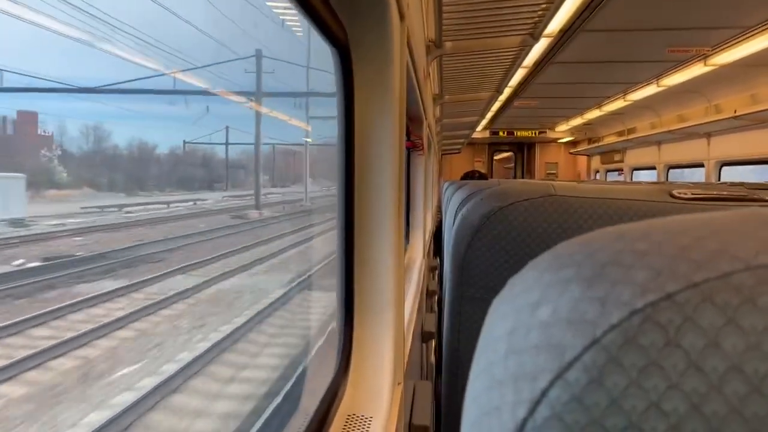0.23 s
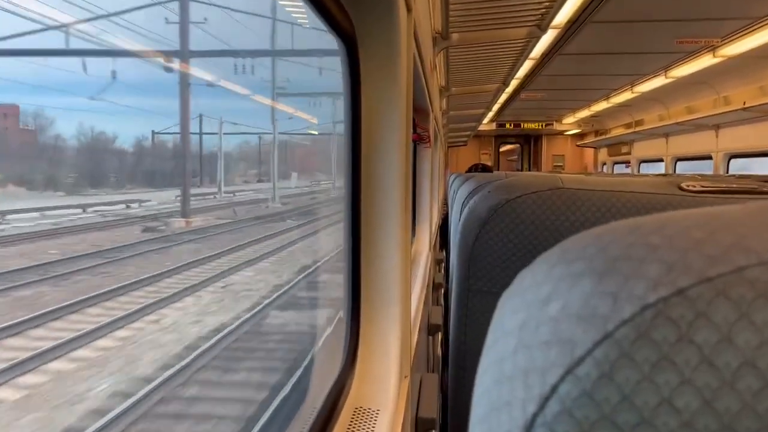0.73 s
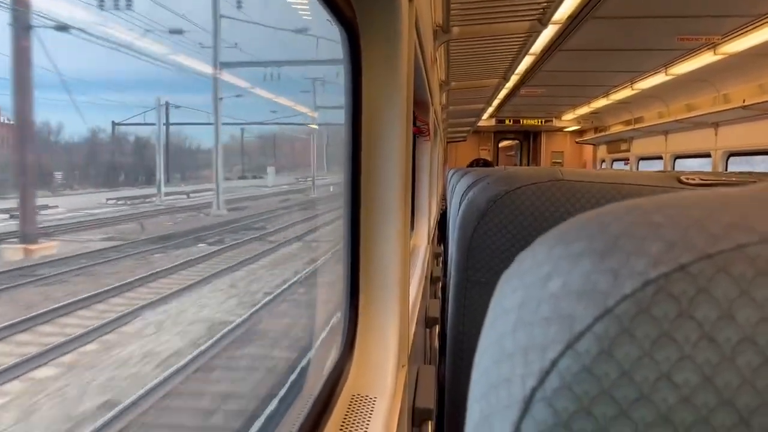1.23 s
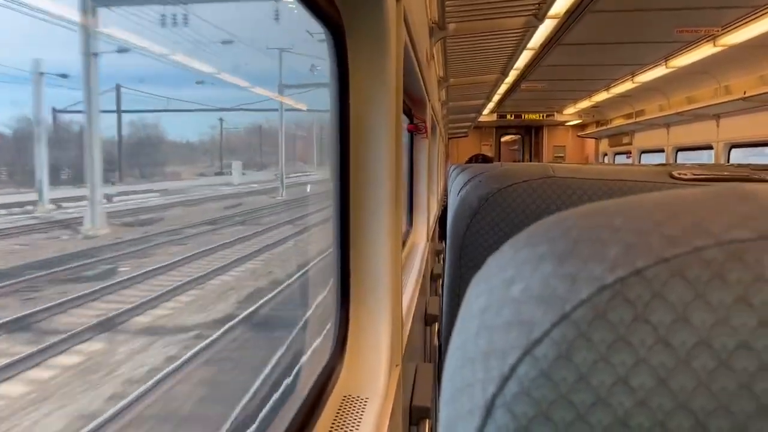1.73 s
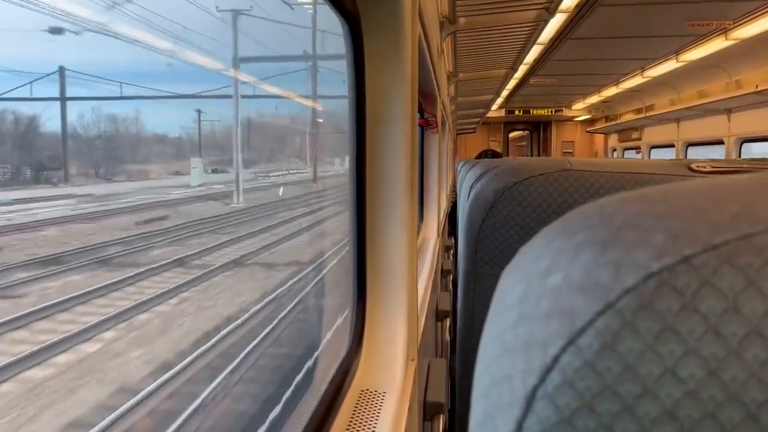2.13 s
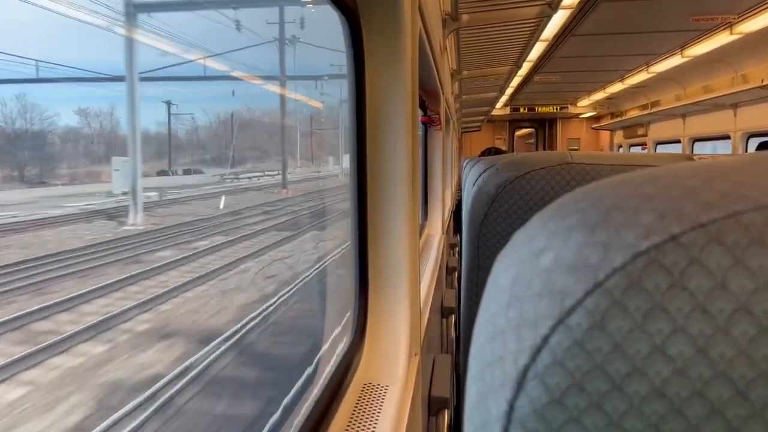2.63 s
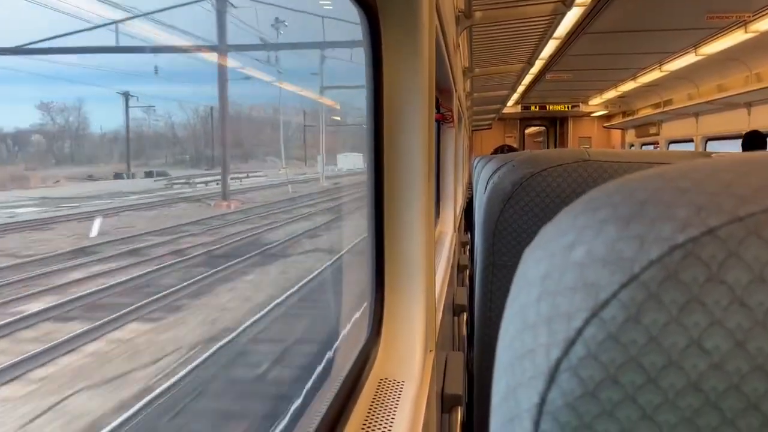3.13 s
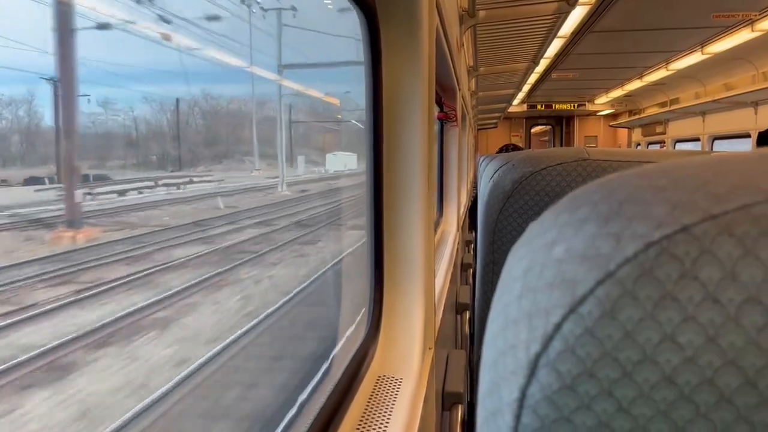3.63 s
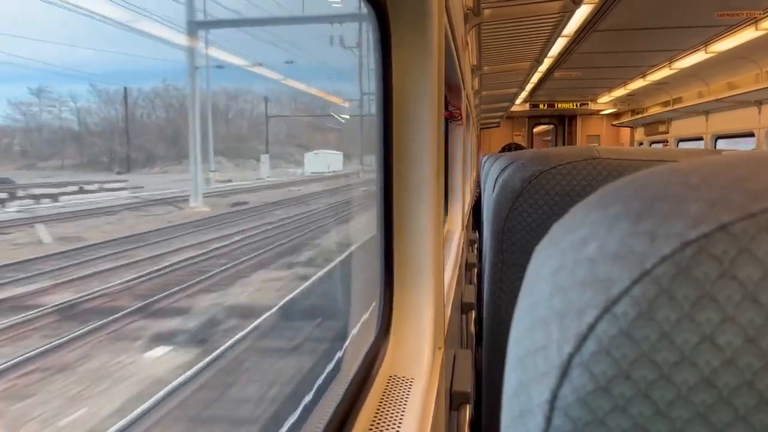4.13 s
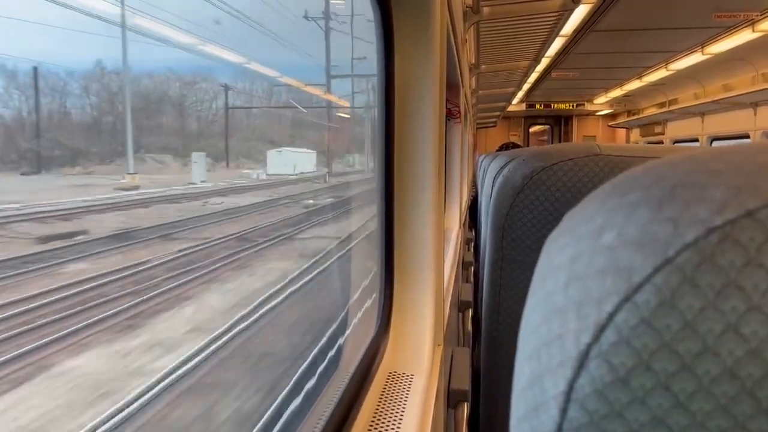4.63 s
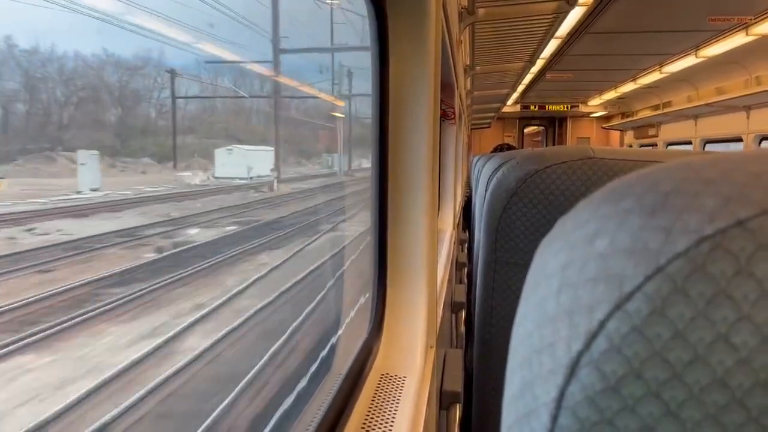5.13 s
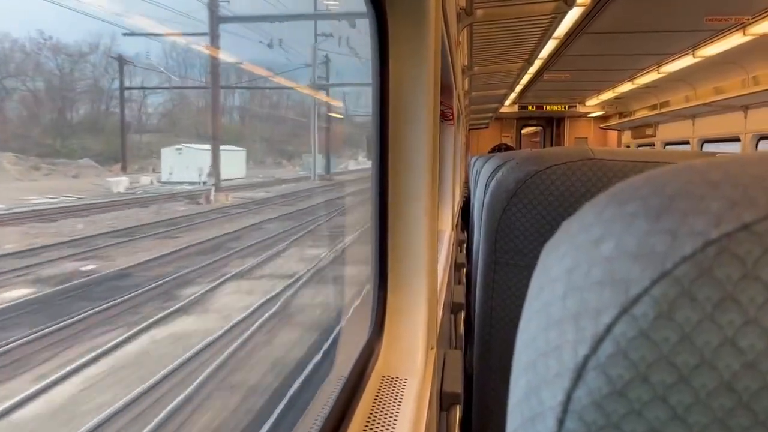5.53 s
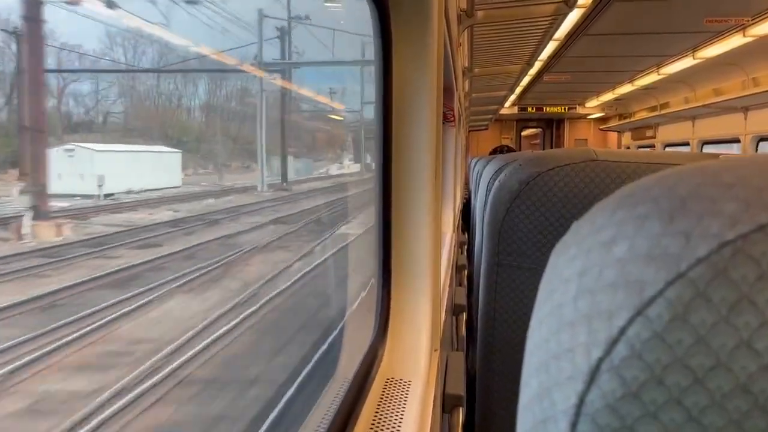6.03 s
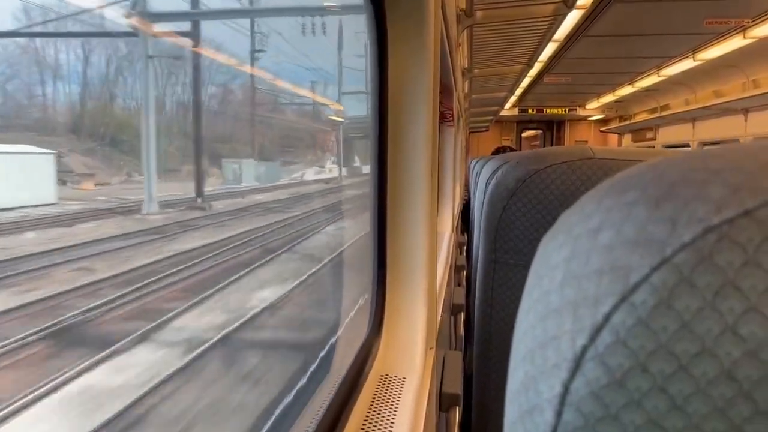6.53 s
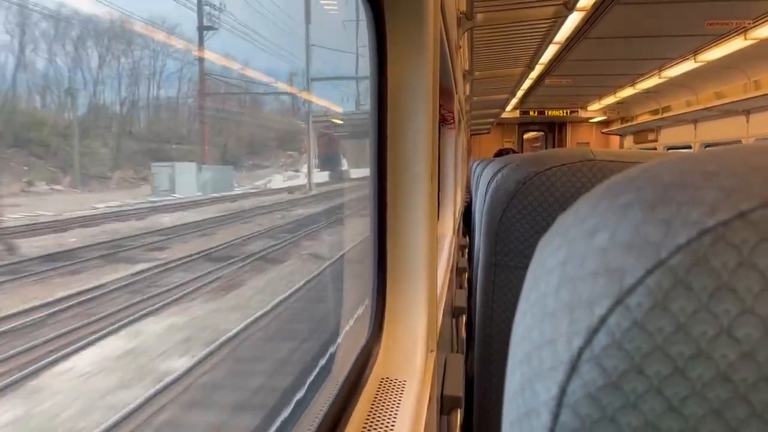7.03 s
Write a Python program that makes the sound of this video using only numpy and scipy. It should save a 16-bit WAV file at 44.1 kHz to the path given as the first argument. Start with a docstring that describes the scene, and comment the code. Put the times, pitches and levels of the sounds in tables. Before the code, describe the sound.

Interior of a moving passenger train, heard by a small stereo microphone at a window seat. Throughout, an unsteady hum around 60 hertz swells and dips over boomy rumble, with soft ventilation and distant rolling noise. From 0 to 1.8 s dull clacks and knocks come fast and uneven, with short rough wheel roars, scrapes and metallic ringing; the sharpest gritty bursts fall near 1.4 and 1.7 s. Around 2.0-2.35 s a thin, faint flange squeal of several high tones accompanies a dense cluster of heavy thuds. From 2.5 to 4.3 s softer clacks and rushing bursts continue, with a tiny squeal near 3.65. The ride then eases; a faint low moan hovers from 4.3 to 5.35 s, with a strong thud at 5.2. Roars and clacks return at 5.5-6.0 s, then mostly smooth humming rolling until a hum swell at 7.2 s, ending mid-ride.

```python
"""Moving passenger coach, by the window

The body hums, booms and drums, bogies thud and wheels clack over a field of switches, and wheels roar
and scrape in bursts: shaped noise and one wavering low hum. Flange squeals are sines of slightly unsteady
pitch, a low moan is a gliding sine, wheel ring is narrow-band noise, and air and distant rolling noise
fill the saloon. A small stereo microphone hears it all, near mono in the bass."""
import sys
import numpy as np
from scipy import signal
from scipy.fft import rfft, irfft, next_fast_len
from scipy.io import wavfile
from scipy.ndimage import uniform_filter1d, map_coordinates

SR = 44100
rng = np.random.default_rng(int(sys.argv[2]) if len(sys.argv) > 2 else 0)


def persist_wave(psi):
    """Save psi, clipped to +-1, as 16-bit WAV."""
    counts = np.round(np.clip(psi, -1, 1) * 32767).astype(np.int16)
    wavfile.write(sys.argv[1], SR, np.atleast_2d(counts).T)


N = 321489

# slow level of the body hum: t/s, level/dB
HUM_LEVEL = [(0, -23.5), (1.2, -25), (2.4, -24.5), (2.8, -29), (3.4, -22), (3.8, -29.5), (4.7, -28),
             (5.1, -29.5), (5.6, -29), (6.5, -24), (7.29, -26)]
# wheels running onto rough rail at the switches: start t/s, rise/s, hold/s,
# then roar level/dB, scrape level/dB, sizzle level/dB, wheel ring level/dB, grind level/dB
BURSTS = [(0.113, 0.068, 0.025, -36.5, -41.5, -54.5, -30.5, -43),
          (0.195, 0.038, 0.11, -31.5, -35.5, -50.5, -29, -36),
          (0.28, 0.058, 0.1, -33.5, -45, -58.5, -30, -37), (0.478, 0.025, 0.066, -29, -36, -52.5, -31, -35),
          (0.647, 0.049, 0.15, -38.5, -42, -60, -33, -40),
          (0.926, 0.073, 0.047, -37.5, -39.5, -55, -35, -41),
          (1.085, 0.065, 0.05, -35.5, -40, -54.5, -41, -40),
          (1.158, 0.047, 0.16, -44, -45.5, -64, -36, -40.5),
          (1.34, .03, 0.039, -30.5, -40, -58.5, -28.5, -44),
          (1.379, 0.042, 0.035, -29, -28, -40.5, -20.5, -30),
          (1.558, 0.062, 0.047, -33, -37.5, -61, -30, -35),
          (1.661, 0.045, 0.016, -29, -27.5, -45.5, -25.5, -31.5),
          (2.11, .025, 0.044, -48, -44.5, -56.5, -48, -48), (2.18, .06, 0.14, -34, -39.5, -59.5, -38, -37),
          (2.376, 0.065, 0.057, -33, -37, -54, -37, -37), (2.56, 0.062, 0.085, -34.5, -37, -51.5, -44, -37),
          (2.85, .04, 0.045, -41, -40.5, -56, -32, -52),
          (2.916, 0.032, 0.067, -34.5, -32.5, -48.5, -36, -36),
          (3.139, 0.064, 0.0015, -34, -41, -56.5, -35, -47),
          (3.211, 0.045, 0.066, -39.5, -37, -50.5, -43, -39),
          (3.614, 0.058, 0.021, -37, -43, -61, -30.5, -38.5),
          (3.726, 0.073, 0.11, -34, -42, -59.5, -34, -39), (3.909, 0.065, 0.1, -37.5, -42, -61, -34.5, -37),
          (4.063, 0.074, 0.02, -33, -40.5, -59.5, -41, -39.5),
          (4.266, 0.06, 0.0045, -41, -41.5, -59.5, -35, -40.5), (4.36, 0.027, 0, -50, -60, -69, -33, -47),
          (4.541, .06, 0.026, -64, -59, -65, -60, -60), (4.695, 0.081, 0.0, -47, -52, -64.5, -47, -48),
          (4.952, .06, 0.055, -42.5, -59, -71, -40, -51), (5.527, 0.13, 0.053, -33.5, -41, -59.5, -31, -38),
          (5.747, 0.058, 0.075, -34, -41.5, -58.5, -29, -40.5),
          (5.929, 0.067, 0.001, -37, -42, -57.5, -35, -37.5),
          (6.174, .06, 0.067, -47, -47, -65.5, -35, -52), (6.526, 0.089, 0.0043, -46, -72, -83, -48, -62),
          (7.102, 0.097, 0.12, -44, -61, -75, -50, -65)]


def amp(db):
    """Decibel law: a level in dB becomes an amplitude ratio."""
    return 10 ** (np.asarray(db) / 20)


def unit(x):
    """Normalisation: each channel is scaled to an rms of 1."""
    return x / np.sqrt(np.mean(x ** 2, axis=-1, keepdims=True) + 1e-20)


def along(points, hz):
    """Logarithmic frequency scale: (f/Hz, value) points are joined by lines along it."""
    f, value = np.transpose(points)
    return np.interp(np.log(hz + 1), np.log(f + 1), value)


def curves(rows):
    """Linear interpolation in time: one value per sample for each column after t/s."""
    times, *columns = np.transpose(rows)
    return [np.interp(np.arange(N) / SR, times, column) for column in columns]


def wobble(rate):
    """Band-limited random modulation: a smooth curve through rate random knots a second."""
    knots = rng.standard_normal(int(N * rate / SR) + 4)
    return map_coordinates(knots, [np.arange(N) * rate / SR])


def filtered(x, response):
    """Linear filtering: the spectrum is multiplied by a response of frequency."""
    m = next_fast_len(N + 8192)
    return irfft(rfft(x, m) * response(np.fft.rfftfreq(m, 1 / SR)), m)[..., :N]


def rush(colours, wide_db, patchy_db):
    """Partial coherence: left-right noise of sum rms 1, its difference partly tied to the sum."""
    # share of the difference in step with the sum, positive to the window on the left: f/Hz, share
    lean = [(60, 0.56), (200, 0.71), (400, 0.59), (750, 0.046), (1700, -0.21), (2600, 0.21), (4000, 0.6),
            (6000, .6), (8000, -0.059)]
    # share a quarter cycle ahead, from the spacing of the two microphones: f/Hz, share
    ahead = [(400, 0), (750, .25), (1000, 0), (1250, -.3), (1600, 0), (2000, .25), (4500, .2), (5600, -.2),
             (8000, 0)]
    sum_colour, difference_colour = colours
    spectra = signal.stft(rng.standard_normal((2, N)), nperseg=512)[2]

    # random gain in patches of frequency and time, common to both noises
    patches = uniform_filter1d(rng.standard_normal(spectra.shape[1:]), size=5, axis=0)
    patches = uniform_filter1d(patches, size=10, axis=1)
    patch_gain = amp(patchy_db * patches / patches.std())
    near, apart = signal.istft(spectra * patch_gain, nperseg=512)[1][:, :N]

    def tied(hz):
        return along(lean, hz) + 1j * along(ahead, hz)

    def untied(hz):
        return np.sqrt(np.clip(1 - np.abs(tied(hz)) ** 2, 0, 1))

    mid = filtered(near, lambda hz: amp(along(sum_colour, hz)))
    side = filtered(near, lambda hz: amp(along(difference_colour, hz)) * tied(hz))
    side = side + filtered(apart, lambda hz: amp(along(difference_colour, hz)) * untied(hz))
    mid, side = unit(mid), amp(wide_db) * unit(side)
    return np.array([mid + side, mid - side])


def steady(x, share):
    """Envelope compression: a share of a noise's chance swells is evened out, to sum rms 1."""
    size = np.sqrt(np.abs(uniform_filter1d(x.mean(0) ** 2, size=SR // 40)) + 1e-4)
    evened = x / size ** np.clip(share, 0, 1)
    return evened / evened.mean(0).std()


def bursts(level_db, steady_db, fade_db_per_s):
    """Addition of powers: gain of steady rolling plus a rise, hold and decibel-linear fade per burst."""
    t = np.arange(N) / SR
    power = np.full(N, amp(steady_db) ** 2)
    for (start, rise, hold, *_), db in zip(BURSTS, level_db):
        span = slice(round(start * SR), round(start * SR) + SR)
        since = t[span] - start
        swell = np.sin(np.pi / 2 * np.clip(since / rise, 0, 1)) ** 1.3
        fade_db = fade_db_per_s * np.clip(since - rise - hold, 0, 1)
        power[span] += (swell * amp(db - fade_db)) ** 2
    return np.sqrt(power)


def hum():
    """Frequency and amplitude modulation: a wavering low hum with listed swells, each with its own pitch."""
    # loudest swells of the hum: start t/s, length/s, f/Hz, level/dB
    swells = [(0.199, 0.21, 60.98, -16.5), (0.324, 0.083, 62.8, -17.5), (0.435, 0.07, 62.4, -17),
              (0.547, 0.05, 58.4, -22.5), (0.601, 0.064, 54.7, -19), (0.67, 0.078, 55.3, -18),
              (0.815, 0.12, 62.76, -13.5), (1.019, 0.062, 55, -20), (1.41, 0.075, 62.3, -10.5),
              (1.562, 0.18, 59.6, -34.5), (1.708, 0.085, 55.76, -17), (1.81, 0.098, 56.05, -16),
              (1.978, 0.078, 56.5, -17), (2.208, 0.065, 60.5, -20.5), (2.31, 0.088, 55.2, -13.5),
              (2.873, 0.17, 61.6, -13), (3.229, 0.13, 61.4, -14), (3.17, 0.075, 58, -20),
              (3.38, .1, 63.9, -19.5), (3.482, .08, 57.6, -18), (3.606, .12, 55.84, -19),
              (3.759, 0.11, 62.36, -22), (4.067, 0.08, 57.1, -17), (4.238, 0.058, 61.7, -22),
              (4.618, 0.068, 64, -18), (4.92, 0.074, 58.3, -15.5), (5.03, 0.12, 62.7, -16),
              (5.201, 0.05, 56.9, -19.5), (5.458, 0.054, 59.3, -19.5), (5.806, 0.057, 60.2, -15),
              (5.895, 0.054, 60, -17), (6.367, 0.1, 64.3, -17.5), (6.763, 0.18, 61.6, -18.5),
              (7.012, 0.096, 57.7, -17.5), (7.218, 0.069, 62, -12)]
    mode_hz, drift_hz, waver_db = 59.97, 3.087, 2.5
    power = amp(curves(HUM_LEVEL)[0] + waver_db * wobble(12)) ** 2
    weighted_hz = power * (mode_hz + drift_hz * wobble(3))  # pitch weighted by power
    for start, length, hz, db in swells:
        first = round(start * SR)
        span = slice(first, first + round(length * SR))
        since = np.arange(len(power[span])) / SR
        swell = (amp(db) * np.sin(np.pi * since / length)) ** 2
        power[span] += swell
        weighted_hz[span] += swell * hz
    phase = 2 * np.pi * np.cumsum(weighted_hz / power + 3.47 * wobble(20)) / SR
    return np.sqrt(2 * power) * np.sin(phase) * amp([[.4], [-.4]])  # slightly louder on the left


def body():
    """Structure-borne sound: the shell hums and rumbles, axles and bogies pound below, panels drum."""
    # levels in the car body: t/s, axle thud level/dB, bogie knock level/dB, panel drumming level/dB
    levels = [(0, -21, -32, -33.5), (.3, -26.5, -22, -27), (.75, -22, -22, -26.5), (1, -22.5, -24, -30),
              (1.2, -22, -18, -25.5), (1.8, -16.5, -21.5, -28), (1.97, -24, -31.5, -33.5),
              (2.22, -21, -23.5, -28), (2.45, -20, -26, -28), (2.82, -28.5, -29, -31),
              (3.15, -20, -29, -30), (3.45, -27, -30.5, -31.5), (3.7, -25.5, -24, -28.5),
              (4.2, -26, -28, -30), (4.75, -29.5, -34, -30.5), (5.04, -27.5, -27, -29.5),
              (5.35, -28.5, -33, -31), (5.7, -25.5, -22, -30), (6, -27, -27, -29.5),
              (6.3, -31.5, -32, -31.5), (6.7, -28, -31.5, -31), (7.29, -29, -30.5, -31.5)]
    # noise colours, each for the sum then the difference of the microphones: f/Hz, level/dB
    boom_colours = ([(11, -33.5), (18, -14.5), (49, 1.5), (90, -8.5), (120, -17), (200, -120)], [(12, -28),
                     (20, -8), (49, 8), (90, -4), (120, -31), (200, -120)])
    thud_colours = ([(48, -38), (82, 0), (150, -1), (200, -39), (330, -120)], [(48, -32.5), (82, -4),
                     (150, -1), (200, -37), (330, -120)])
    knock_colours = ([(88, -24), (150, 1.5), (270, -6), (350, -32), (590, -120)], [(88, -31), (150, -2),
                      (189, 1), (242, -2), (270, 1), (350, -26), (590, -120)])
    panel_colours = ([(150, -27), (260, -3.5), (334, 0.5), (415, -5), (460, -1.5), (584, -14), (650, -22.5),
                      (840, -30.5), (1430, -120)], [(150, -36), (260, -3.5), (324, 4), (423, 1), (493, 4),
                      (588, -5), (650, -9), (840, -28), (1430, -120)])
    rumble_mean_db, rumble_follows = -24.5, 0.69  # share of the hum's level swing

    thud_db, knock_db, panel_db = curves(levels)
    hum_db = curves(HUM_LEVEL)[0]
    rumble_db = rumble_mean_db + rumble_follows * (hum_db - hum_db.mean()) + 0.42 * wobble(4)
    rumble = amp(rumble_db) * steady(rush(boom_colours, wide_db=-23.5, patchy_db=0.0), share=0.43)
    thud = amp(thud_db) * steady(rush(thud_colours, wide_db=-22.0, patchy_db=0.9), share=0.083)
    knock = amp(knock_db) * steady(rush(knock_colours, wide_db=-14.5, patchy_db=1.0), share=0.12)
    panels = amp(panel_db) * rush(panel_colours, wide_db=-6.5, patchy_db=1.56)
    return hum() + rumble + thud + knock + panels


def rail():
    """Roughness excitation: rough rail shakes wheel and rail, and one chatter drives four noise bands."""
    # noise colours, each for the sum then the difference of the microphones: f/Hz, level/dB
    roar_colours = ([(380, -17), (640, 1), (679, -2), (748, 3.5), (1120, 1), (1290, -1), (1540, -1.5),
                     (1750, -7.5), (2280, -27.5), (3850, -120)], [(380, -36), (640, 0), (838, -0.5),
                     (996, -2), (1070, -3), (1270, -8.5), (1560, -2), (1750, -13), (2280, -42.5),
                     (3850, -120)])
    grind_colours = ([(1030, -29), (1750, -2.5), (2400, -4), (2580, -5.5), (3350, -7.5), (4360, -24.5),
                      (7370, -120)], [(1030, -28), (1750, 6), (2000, -4), (2170, 1), (2580, -0.5),
                      (3350, -1.5), (4360, -31), (7370, -120)])
    scrape_colours = ([(1970, -11), (3350, -1), (4390, 1.5), (5470, -3.5), (7270, -13.5), (7670, -23.5),
                       (7900, -58), (8200, -57), (10700, -61), (18000, -120)], [(1970, -31), (3350, -1.5),
                       (3690, 2.5), (5310, -2), (6190, -8.5), (6900, -11), (8200, -11.5), (10700, -43.5),
                       (18000, -120)])
    sizzle_colours = ([(5180, -70), (8800, -15.5), (9440, 6.5), (10600, 10.5), (12900, 5), (14200, -6)],
                       [(4760, -28.5), (8100, -1.5), (8570, 1), (9510, 0.5), (10600, -11.5), (11000, -25),
                       (14300, -19), (22000, -120)])
    roar_db, scrape_db, sizzle_db, _, grind_db = np.transpose(BURSTS)[3:]
    chatter = wobble(25)

    roar = bursts(roar_db, steady_db=-38, fade_db_per_s=92) * amp(0.11 * chatter)
    roar = roar * rush(roar_colours, wide_db=0.2, patchy_db=1.14)
    grind = bursts(grind_db, steady_db=-46.5, fade_db_per_s=73) * amp(0.22 * chatter)
    grind = grind * rush(grind_colours, wide_db=-4.0, patchy_db=1.75)
    scrape = bursts(scrape_db, steady_db=-52, fade_db_per_s=91) * amp(0.69 * chatter)
    scrape = scrape * rush(scrape_colours, wide_db=-1.5, patchy_db=1.4)
    sizzle = bursts(sizzle_db, steady_db=-70.5, fade_db_per_s=97) * amp(0.8 * chatter)
    sizzle = sizzle * rush(sizzle_colours, wide_db=2.5, patchy_db=3.5)
    return roar + grind + scrape + sizzle


def wheel_ring():
    """Resonance: rolling noise in narrow wheel modes, independent at each microphone, swells in bursts."""
    # wheel modes kept faintly ringing: f/Hz, width of one resonator pass/Hz, relative level/dB
    modes = [(1570, 63, -9.5), (1410, 140, -13), (1790, 180, -19.5), (2173, 200, -15.5), (858, 82, -21),
             (2830, 290, -19)]
    ring = 0
    for hz, width, db in modes:
        def two_passes(f):
            return (1j * f * width / (hz * hz - f * f + 1j * f * width)) ** 2
        noise = unit(filtered(rng.standard_normal((2, N)), two_passes))
        ring = ring + amp(db + 1.5 * wobble(5.1)) * noise
    return bursts(np.transpose(BURSTS)[6], steady_db=-37.5, fade_db_per_s=100) * ring


def saloon():
    """Broadband stationary noise: steady ventilation and distant rolling."""
    # noise colours for the sum then the difference of the microphones: f/Hz, level/dB
    air_colours = ([(350, -41.5), (600, 11), (1560, -11), (2610, -15), (4140, -10), (7220, -55),
                    (7710, -55), (8130, -85), (9160, -67), (9780, -31.5), (11200, -36), (13600, -62),
                    (14200, -82.5)], [(350, -35), (600, 7), (854, 9), (1280, -10), (1570, -8), (1910, -21),
                    (4150, -16), (6600, -43), (9620, -29.5), (10500, -40), (11000, -77), (14300, -109),
                    (22000, -120)])
    return amp(-41.5 + 0.36 * wobble(0.45)) * rush(air_colours, wide_db=-1.0, patchy_db=1.1)


def clacks():
    """Impulse response: each blow reaches the floor softened by the springs and rings two modes briefly."""
    # wheels dropping over joints and frogs: t/s, level before onset and decay/dB, floor ring f/Hz
    blows = [(0.097, -8, 210.5), (0.199, -10.5, 225.5), (0.289, -13, 89), (0.305, -17, 322),
             (0.4, -7.5, 195.4), (0.505, -13.5, 280), (0.523, -13, 139), (0.602, -9.5, 193),
             (0.682, -5, 124.6), (0.81, -10.5, 167.4), (1.07, -7.5, 147), (1.155, -4, 128),
             (1.24, -7.5, 114.4), (1.73, -9.5, 112), (2.095, -16, 207), (2.113, -9, 135.5),
             (2.205, -6, 110.7), (2.228, -11.5, 167), (2.24, -2, 121.5), (2.3, -6, 158), (2.345, -7, 133),
             (2.4, -14, 195), (2.475, -7, 103), (2.506, -14, 154), (2.589, -19, 119), (2.908, -15, 108),
             (3.075, -17, 110), (3.1, -15.5, 182.5), (3.191, -13, 112), (3.219, -17, 226), (3.399, -15, 94),
             (3.529, -13, 169.4), (3.619, -14.5, 120), (3.663, -8, 173.4), (3.691, -12, 110),
             (3.765, -11, 130), (3.93, -16.5, 219), (4.009, -11, 182.5), (4.115, -9.5, 183),
             (4.19, -12.5, 128.6), (4.295, -10.5, 112), (4.479, -24, 114), (4.747, -18.5, 111),
             (4.936, -15, 118.5), (5.025, -14, 171), (5.2, -5.5, 112), (5.487, -13.5, 241),
             (5.59, -10.5, 180), (5.646, -22, 189), (5.766, -8, 92.6), (5.914, -18, 111), (5.98, -17, 111),
             (6.802, -19, 122)]
    out, t = np.zeros(N + SR), np.arange(SR // 3) / SR
    swell = (1 - np.exp(-t / 0.0066)) * amp(-60 * t / 0.2)  # soft onset, then 60 dB decay per 0.2 s
    for start, db, hz in blows:
        detune, turn = rng.random(2)
        neighbour_hz = hz * (1.3 + 0.291 * detune)
        ring = np.sin(2 * np.pi * hz * t) + 0.43 * np.sin(2 * np.pi * (neighbour_hz * t + turn))
        out[round(start * SR):][:len(t)] += amp(db) * swell * ring
    return out[:N] * amp([[.9], [-.9]])  # louder on the left


def squeal():
    """Stick-slip: a flange sings a wheel mode, its irregular level built from short overlapping swells."""
    # flange squeals: wheel mode f/Hz, pitch scatter/Hz, left over right level/dB, left phase lead/rad,
    # swells of the level as (start t/s, rise/s, fade/s, level/dB)
    squeals = [(3214, 4, 3, -.3, [(2.022, .022, .022, -44), (2.048, .027, .03, -36.5),
               (2.108, .03, .04, -42)]), (2236, 4, -2.5, .7, [(2.07, .035, .04, -43),
               (2.1, .035, .045, -34), (2.125, .045, .05, -34.5), (2.15, .042, .045, -32),
               (2.205, .045, .04, -35), (2.24, .035, .022, -35.5), (2.31, .022, .025, -41)]),
               (4468, 5, 9, .4, [(2.075, .03, .04, -45), (2.098, .045, .055, -34), (2.16, .05, .06, -40.5),
               (2.25, .022, .045, -37), (2.285, .035, .04, -43)]),
               (2140, 15, -2, 1.2, [(3.585, .05, .05, -41.5), (3.635, .06, .07, -36.5)]),
               (2385, 13, 0, .4, [(4.43, .04, .04, -49), (4.465, .04, .04, -43.5)])]
    rough_db_per_hz = 0.05  # a squeal that scatters in pitch also flutters in level
    out, t = 0, np.arange(N) / SR
    half = np.array([[.5], [-.5]])
    for hz, scatter_hz, pan_db, lead, swells in squeals:
        power = 0
        for start, rise, fade, db in swells:
            ramp = np.interp(t, [start, start + rise, start + rise + fade], [0, 1, 0])
            power = power + amp(db) ** 2 * np.sin(np.pi / 2 * ramp) ** 4
        phase = 2 * np.pi * np.cumsum(hz + scatter_hz * wobble(70)) / SR
        flutter = amp((0.7 + rough_db_per_hz * scatter_hz) * wobble(60))
        # the two microphones get the tone over different paths
        tone = amp(pan_db * half) * np.sin(phase + lead * half)
        out = out + np.sqrt(2 * power) * flutter * tone
    return out


def moan():
    """Interaural phase difference: a fuzzy low tone from under the floor, out of step between channels."""
    # course of the moan: t/s, f/Hz, level/dB
    course = [(4.3, 496.3, -54), (4.6, 502, -47), (5.1, 496.7, -41.5), (5.35, 504, -42)]
    hz, db = curves(course)
    t = np.arange(N) / SR
    phase = 2 * np.pi * np.cumsum(hz + 2.5 * wobble(10)) / SR
    sounding = (t > course[0][0]) & (t < course[-1][0])
    level = np.sqrt(2) * amp(db + 1.2 * wobble(9.4))
    return sounding * level * np.sin(phase + np.array([[.9], [-.9]]))


def scene():
    """Superposition: the pressures of all sources add at the seat by the window."""
    return body() + rail() + wheel_ring() + saloon() + clacks() + squeal() + moan()


def record(dry):
    """Saturation and band limiting: the input rounds off the highest peaks and cuts all above 14325 Hz."""
    soft = dry / (1 + np.abs(dry) ** 6) ** (1 / 6)
    return filtered(soft, lambda hz: hz < 14325)


dry = scene()
out = record(dry)
persist_wave(out)
```